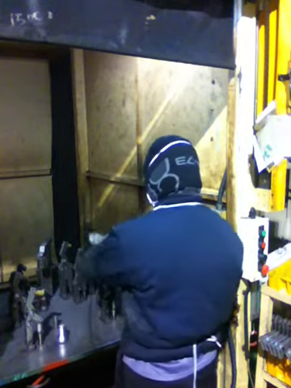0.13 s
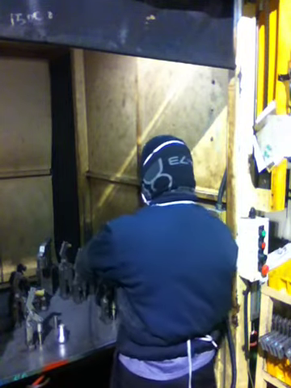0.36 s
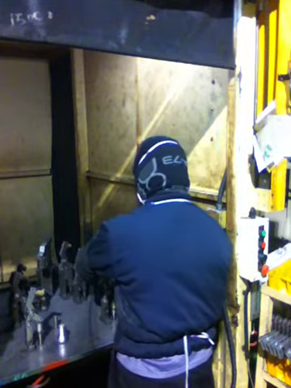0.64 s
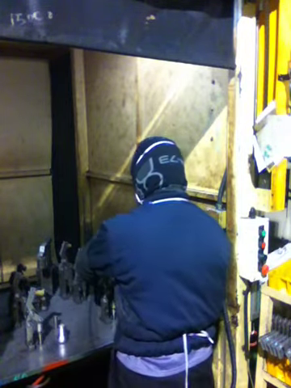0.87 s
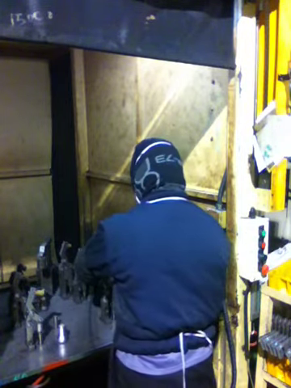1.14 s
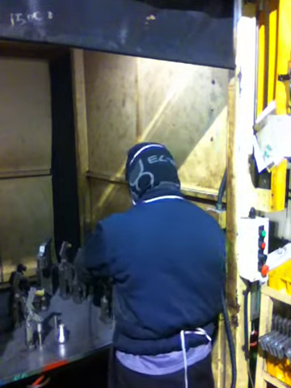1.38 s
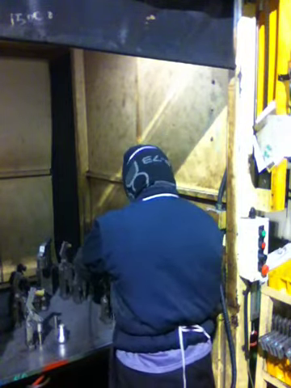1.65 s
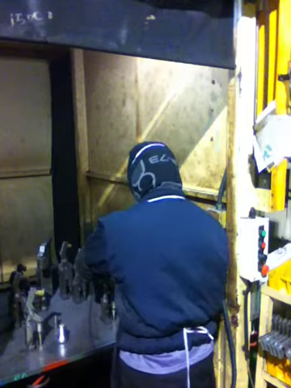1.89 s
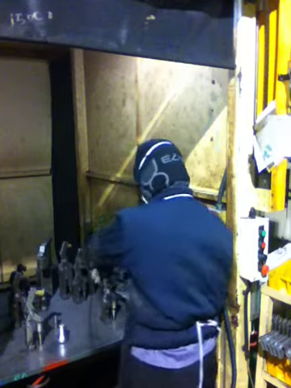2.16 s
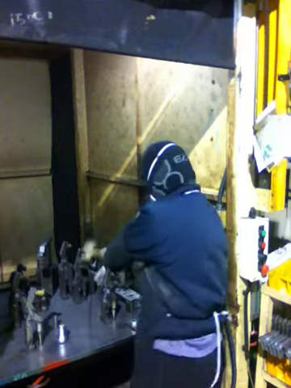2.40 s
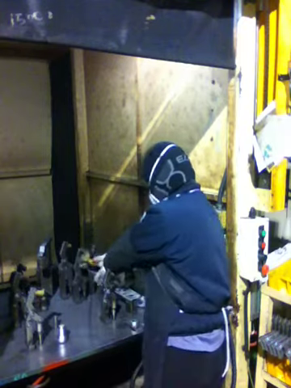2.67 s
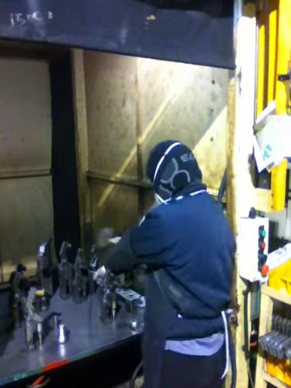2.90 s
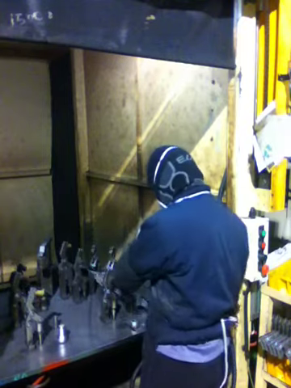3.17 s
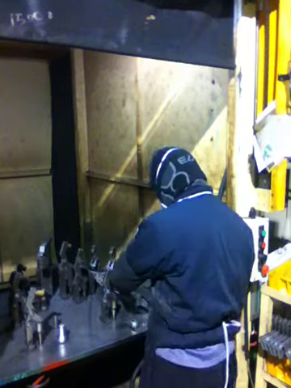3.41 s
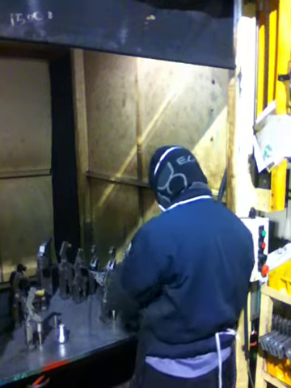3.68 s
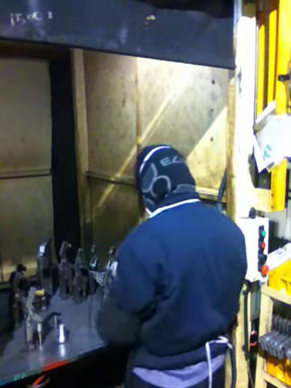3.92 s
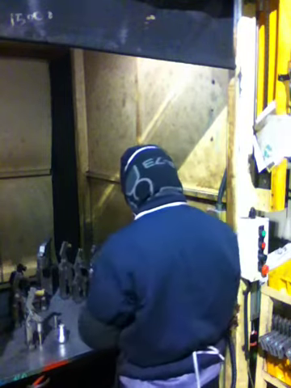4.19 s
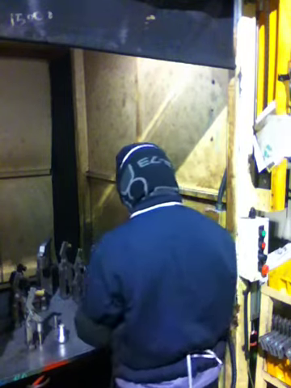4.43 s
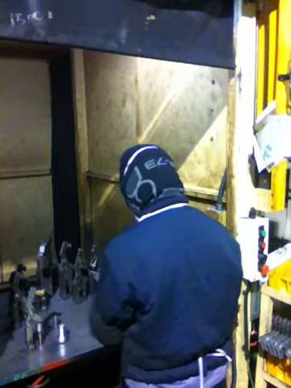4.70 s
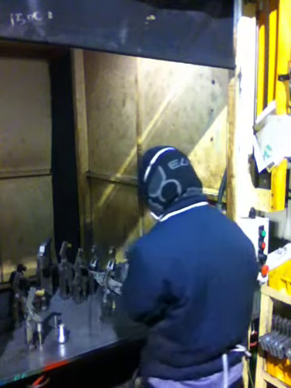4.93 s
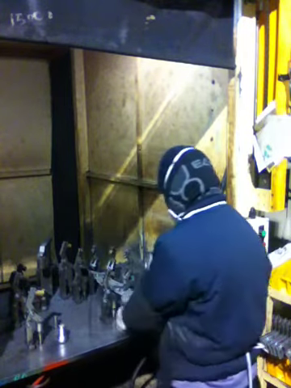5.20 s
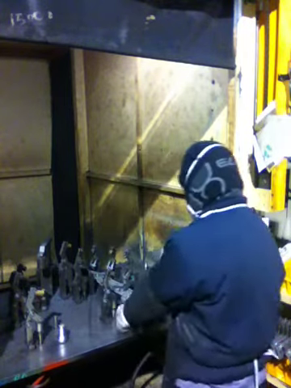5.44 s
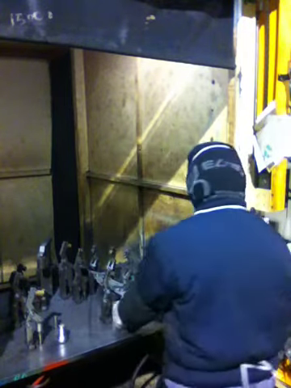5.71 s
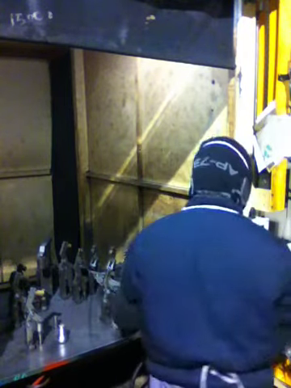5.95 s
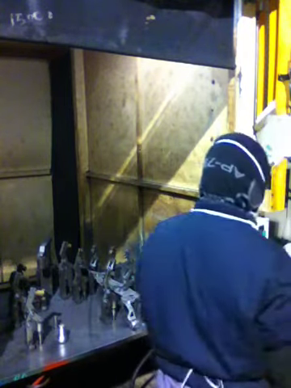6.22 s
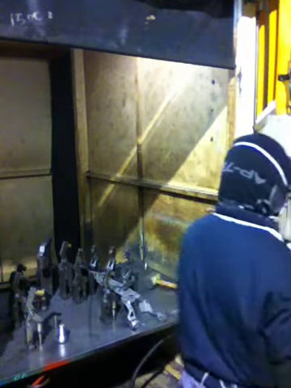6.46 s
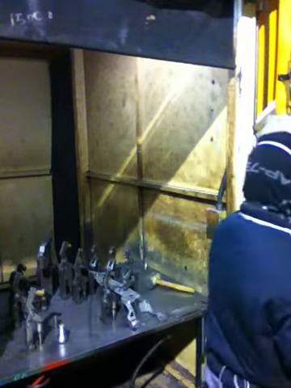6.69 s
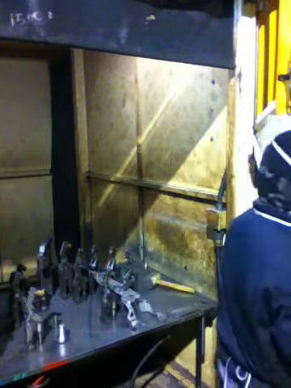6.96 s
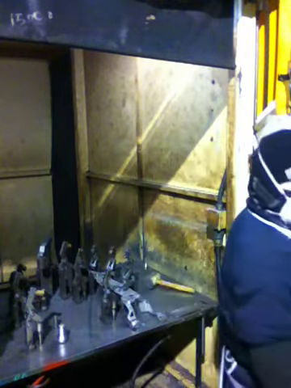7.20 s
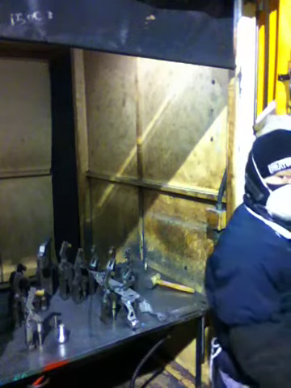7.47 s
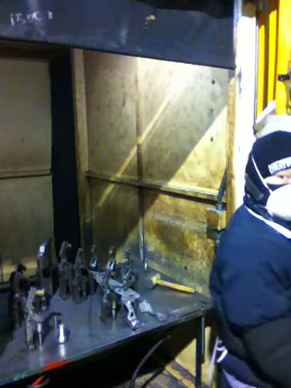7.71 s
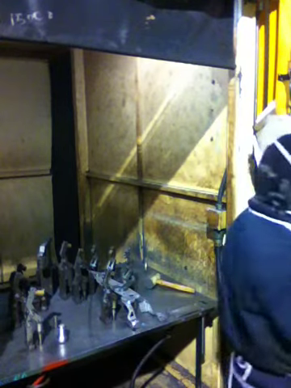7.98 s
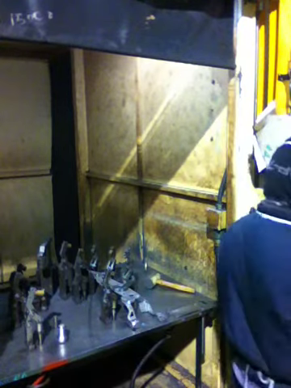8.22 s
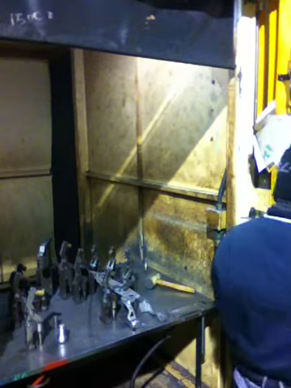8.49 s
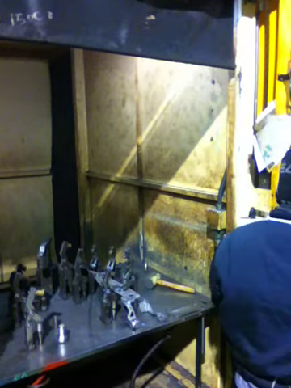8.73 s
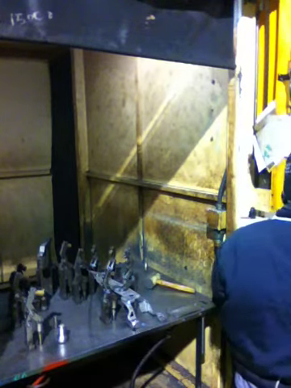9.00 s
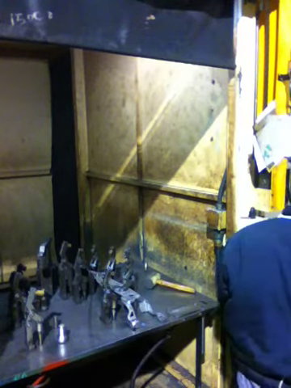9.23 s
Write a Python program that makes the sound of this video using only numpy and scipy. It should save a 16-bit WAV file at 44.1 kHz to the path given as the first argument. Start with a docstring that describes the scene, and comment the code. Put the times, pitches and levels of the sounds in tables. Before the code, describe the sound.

Inside a workshop bay, compressed air leaks in a dense, steady, slightly fluttering hiss that masks nearly everything. An extraction fan hums faintly below. A worker handles steel clamps: one clear metallic snap with a thud, several softer knocks, a second duller snap, then sparse faint clatters that linger. Almost mono sound from a single microphone, with weak bass and brief small sparkles of width in the treble.

```python
"""A workshop bay filled by the steady hiss of leaking compressed air, over the drone of an extraction fan.
Hiss and drone are shaped noise with resonant peaks; small patches of the treble turn wide for a moment.
A worker shuts steel clamps (decaying sines) and sets parts down on a steel table (decaying noise bands);
the blows barely rise out of the hiss. One microphone with a bass cut feeds both channels."""
import sys
import numpy as np
from scipy import signal
from scipy.fft import rfft, irfft, next_fast_len
from scipy.io import wavfile

SR = 44100
rng = np.random.default_rng(int(sys.argv[2]) if len(sys.argv) > 2 else 0)


def dump_mix(stems):
    """Bounce the given channels to the path in sys.argv[1] as a 16-bit WAV at rate SR."""
    frames = np.atleast_2d(stems).T  # one column per channel
    limited = np.clip(frames, -1, 1)  # hard clip at full scale
    pcm = np.round(limited * 32767).astype(np.int16)
    wavfile.write(sys.argv[1], SR, pcm)


def attenuation_scalar(level_db):
    """Turn a level in dB into a linear amplitude multiplier (20 dB per decade)."""
    decades = np.asarray(level_db, float) / 20
    return 10 ** decades


N = 413216
TOP_CUT_HZ = 15740


def rms_one(x):
    """Scale to rms 1."""
    return x / np.sqrt(np.mean(x ** 2) + 1e-20)


def drift(corner_hz):
    """Slow random wander of rms 1: coarse noise through two equal one-pole low-passes."""
    step = 40   # samples per coarse point
    run_in = 2000
    pole = np.exp(-2 * np.pi * corner_hz * step / SR)
    coarse = rng.standard_normal(N // step + run_in + 2)
    slow = signal.lfilter([1], [1, -2 * pole, pole * pole], coarse)[run_in:]
    return np.interp(np.arange(N) / step, np.arange(len(slow)), rms_one(slow))


def coloured_noise(spectrum, peaks):
    """Noise with a broad spectrum and narrow bell-shaped peaks; rms 1."""
    size = next_fast_len(N)
    hz = np.arange(size // 2 + 1) * SR / size + 1e-3   # offset keeps the log finite
    knots_hz, knots_db = np.transpose(spectrum)
    shape_db = np.interp(np.log(hz), np.log(knots_hz), knots_db)
    for peak_hz, width_hz, peak_db in peaks:
        shape_db = shape_db + peak_db / (1 + (2 * (hz - peak_hz) / width_hz) ** 2)
    white = rfft(rng.standard_normal(size))
    return rms_one(irfft(white * attenuation_scalar(shape_db), size)[:N])


def band_noise(band_hz):
    """White noise through a band-pass; rms 1."""
    band = signal.butter(2, band_hz, "band", fs=SR, output="sos")
    return rms_one(signal.sosfilt(band, rng.standard_normal(N)))


def dying(start_s, level_db, t60_s, rise_s):
    """Envelope of one blow: quick exponential rise, then exponential decay, cut at t60."""
    out = np.zeros(N)
    start = round(start_s * SR)
    since_s = np.arange(min(N - start, round(t60_s * SR))) / SR
    rise = 1 - np.exp(-since_s / rise_s)
    out[start:start + len(since_s)] = attenuation_scalar(level_db - 60 * since_s / t60_s) * rise
    return out


HOSE_HZ, HOSE_WIDTH_HZ = 156.25, 42
HOSE_EVEN_DB, HOSE_ODD_DB, HOSE_SPREAD_DB = 5, 2.5, 1.0   # before the fade
HOSE_CENTRE_HZ, HOSE_REACH_HZ = 8800, 1300   # brightest part of the hiss


def hose_peaks():
    """Air hose resonances at multiples of one pitch: even ones stronger, scattered, fading off centre."""
    order = np.arange(30, 90)
    hz = order * HOSE_HZ
    mean_db = np.where(order % 2, HOSE_ODD_DB, HOSE_EVEN_DB)
    strength_db = mean_db + HOSE_SPREAD_DB * rng.standard_normal(len(hz))
    fade = np.exp(-0.5 * ((hz - HOSE_CENTRE_HZ) / HOSE_REACH_HZ) ** 2)
    return [(peak_hz, HOSE_WIDTH_HZ, db) for peak_hz, db in zip(hz, strength_db * fade)]


# Air jet spectrum. Each row: frequency in Hz, relative density in dB per Hz.
JET_SPECTRUM = [(700, -29), (1200, -15.5), (2280, -12.5), (2990, -7.5), (3470, -6.5), (4740, -5.5),
                (6750, -3.5), (7850, -1.5), (9020, -1), (11100, -2.5), (13000, -2), (14500, -0.5),
                (16000, -2.5)]
# Peaks from nozzle and nearby reflections. Each row: frequency in Hz, width in Hz, height in dB.
JET_PEAKS = [(4500, 60, 2.5), (4870, 120, 3), (5310, 60, 3), (5970, 160, 2), (7120, 55, 4), (7570, 85, 4),
             (9827, 40, 4), (10569, 45, 5), (11193, 50, 4), (11761, 50, 4), (12050, 62, 4), (13480, 180, 3)]
JET_DB = -17.5
ECHO_DB, ECHO_T60_S, ECHO_BAND_HZ = -41.0, 0.15, (4500, 13000)


def air_jet():
    """Turbulent hiss, fluttering slightly as a whole; dense bright fixture echoes ruffle its spectrum."""
    lag_s = np.arange(SR // 10) / SR
    echoes = attenuation_scalar(ECHO_DB - 60 * lag_s / ECHO_T60_S) * band_noise(ECHO_BAND_HZ)[:len(lag_s)]
    echoes[0] = 1   # direct sound
    jet = coloured_noise(JET_SPECTRUM, JET_PEAKS + hose_peaks())
    hiss = rms_one(signal.fftconvolve(jet, echoes)[:N])
    flutter_db = 0.4 * drift(1.8) + 0.22 * drift(25.0)
    return attenuation_scalar(JET_DB + flutter_db) * hiss


# Fan and hall rumble. Each row: frequency in Hz, relative density in dB per Hz.
FAN_SPECTRUM = [(15, -72), (25, -42), (53, -60), (88, -17.5), (128, -16), (205, -1), (346, -12), (376, -10),
                (431, -11), (518, -9), (554, -10), (845, -15), (1400, -22.5), (1820, -40), (3080, -120)]
# Duct resonances and wavering motor tones. Each row: frequency in Hz, width in Hz, height in dB.
FAN_PEAKS = [(106, 8.8, 3.5), (148, 10, 1.5), (202.4, 9.9, 7.5), (223.7, 6.2, 4.5), (252.6, 8.6, 5.5),
             (323.5, 8.2, 7), (375, 10.4, 5.5), (458, 10, 2), (514, 10, 9), (761, 6, 5.5), (1064, 105, 5)]
# Course of the drone, before wander and thinning of the lows. Each row: time in seconds, level in dB.
DRONE_LEVEL = [(0, -35), (2.5, -35.5), (5.3, -35.5), (7.2, -36), (7.8, -35.5), (8.7, -35), (9.37, -36.5)]


def fan():
    """Low drone, wavering in level; below about 118 Hz the sound thins out at random moments."""
    level_db = np.interp(np.arange(N) / SR, *np.transpose(DRONE_LEVEL))
    drone = coloured_noise(FAN_SPECTRUM, FAN_PEAKS)
    low_pass = signal.butter(6, 118, fs=SR, output="sos")
    lows = signal.sosfiltfilt(low_pass, drone)
    lows_db = 3.5 + 8.3 * np.minimum(drift(10.0), 0)
    lows_change = attenuation_scalar(lows_db) - 1   # the drone already holds the lows once
    return attenuation_scalar(level_db + 0.6 * drift(7.8)) * (drone + lows_change * lows)


def treble_flicker():
    """Now and then a narrow patch of treble turns wide for a moment: noise for the side signal."""
    out = np.zeros(N)
    size, hop, chance = 2048, 1024, 0.095
    window = np.sin(np.pi * np.arange(size) / size)
    starts = np.flatnonzero(rng.random(N // hop - 2) < chance) * hop
    for start, pitch in zip(starts, rng.random(len(starts))):
        hz = 4600 + 10800 * pitch
        edges_hz = [hz - 0.045 * hz - 350, min(hz + 0.05 * hz + 350, TOP_CUT_HZ)]
        band = signal.butter(8, edges_hz, "band", fs=SR, output="sos")
        patch = rms_one(signal.sosfilt(band, rng.standard_normal(size)))
        out[start:start + size] += attenuation_scalar(-32.5 + 5.0 * pitch) * patch * window
    return out


# Clamps and parts land. Each row: start in seconds, thud in dB, clatter in dB, clatter t60 in seconds.
BLOWS = [(2.564, -28.5, -31, .4), (2.75, -34, -34, .2), (3.27, -32, -44, .4), (3.5, -35, -35, .3),
         (4.005, -35.5, -37, .25), (4.27, -48, -30, .2), (6.12, -44, -35.5, 2.2), (6.4, -40, -40, 1.2),
         (8.262, -40, -34.5, 1.2), (9.05, -37, -34, .27)]
THUD_BAND_HZ, THUD_T60_S, THUD_RISE_S = (143, 420), 0.42, 0.0072
CLATTER_BAND_HZ, CLATTER_RISE_S = (1310, 3600), 0.004


def table():
    """The table top thuds, rising a little late; loose parts and the hall answer with a mid clatter."""
    thud = sum(dying(s, thud_db, THUD_T60_S, THUD_RISE_S) for s, thud_db, _, _ in BLOWS)
    clatter = sum(dying(s, clatter_db, t60_s, CLATTER_RISE_S) for s, _, clatter_db, t60_s in BLOWS)
    return thud * band_noise(THUD_BAND_HZ) + clatter * band_noise(CLATTER_BAND_HZ)


# Clamps snap shut. Each row: start in seconds, level in dB.
SNAPS = [(2.565, -21), (4.005, -27), (6.4, -31)]
# Ringing modes of a steel clamp. Each row: frequency in Hz, mean level re snap in dB, t60 in seconds.
CLAMP_MODES = [(2640, -12, .18), (2900, 0, .1), (3500, -7, .08), (4200, -12, .07), (5700, -6, .08)]
CONTACT_S, MODE_SPREAD_DB = 0.0027, 1.9


def clamp_ring():
    """Each mode builds up over the few ms of contact, with its own strength per snap, and dies."""
    out = np.zeros(N)
    spread_db = MODE_SPREAD_DB * rng.standard_normal((len(SNAPS), len(CLAMP_MODES)))
    for k, (hz, mode_db, t60_s) in enumerate(CLAMP_MODES):
        swing = np.zeros(N)
        for (start_s, snap_db), offset_db in zip(SNAPS, spread_db[:, k]):
            swing += dying(start_s, snap_db + mode_db + offset_db, t60_s, CONTACT_S)
        cycles = hz * np.arange(N) / SR + rng.random()
        out += swing * np.sin(2 * np.pi * cycles)
    return out


def scene():
    """All sources reach one microphone; the flicker is added left, taken away right."""
    mono = air_jet() + fan() + table() + clamp_ring()
    side = treble_flicker()
    return np.array([mono + side, mono - side])


def band_limit(x):
    """A steep low-pass at the top of the band."""
    return signal.sosfilt(signal.butter(12, 16950, fs=SR, output="sos"), x)


BASS_CUT_HZ = 66


def record(dry):
    """The microphone cuts the bass; the top is cut like a wall."""
    high_pass = signal.butter(2, BASS_CUT_HZ, "high", fs=SR, output="sos")
    thin = signal.sosfilt(high_pass, dry)
    size = next_fast_len(N)
    passed = np.arange(size // 2 + 1) * SR / size < TOP_CUT_HZ
    mix = irfft(rfft(thin, size) * passed, size)[:, :N]
    return band_limit(mix)


dry = scene()
out = record(dry)
dump_mix(out)
```